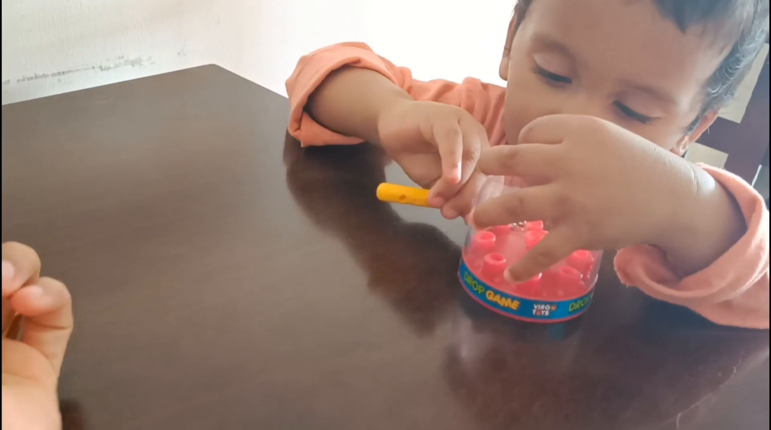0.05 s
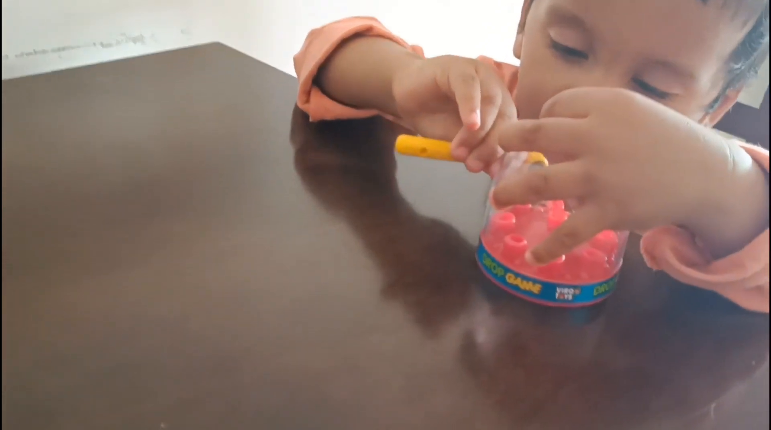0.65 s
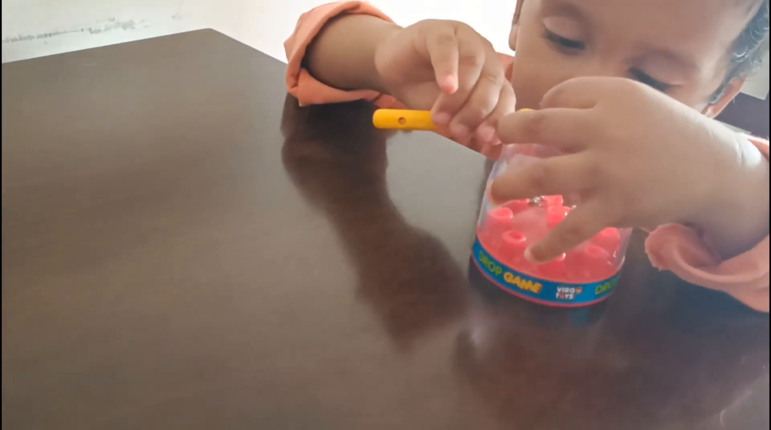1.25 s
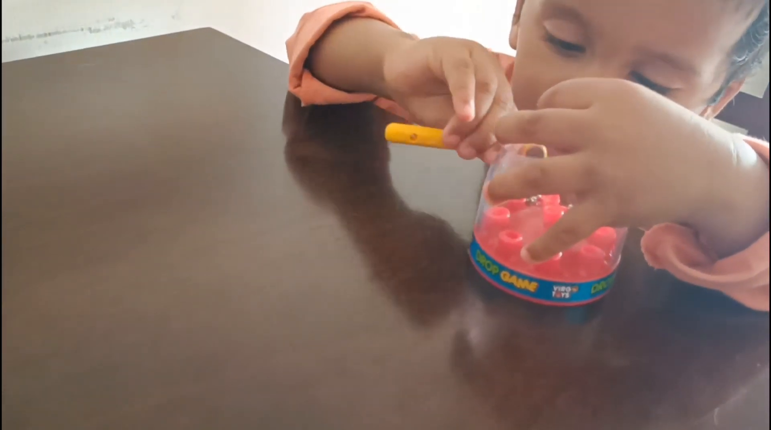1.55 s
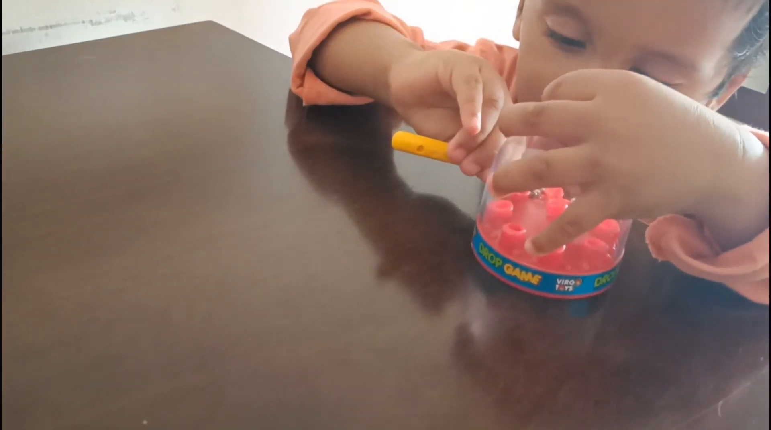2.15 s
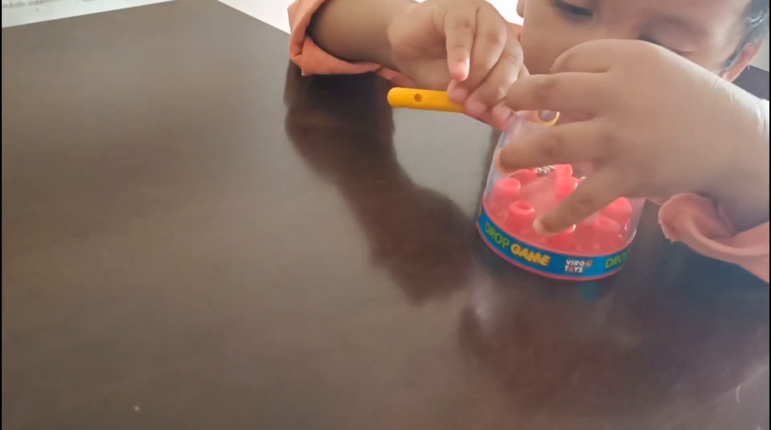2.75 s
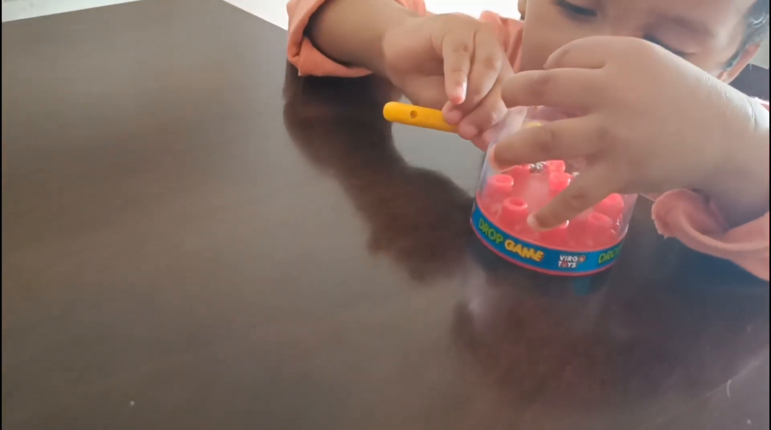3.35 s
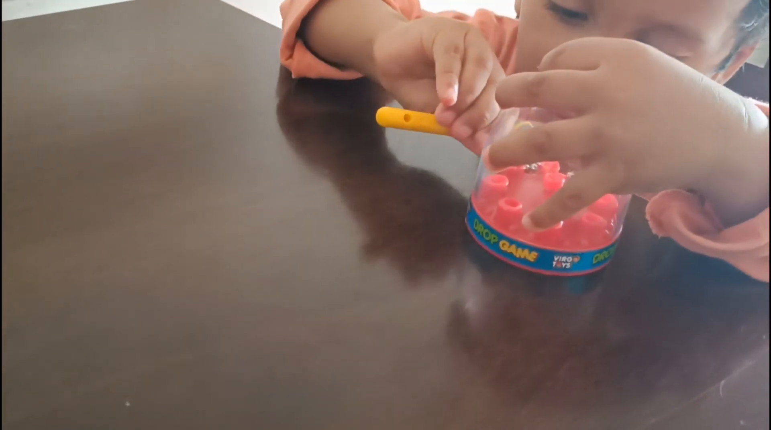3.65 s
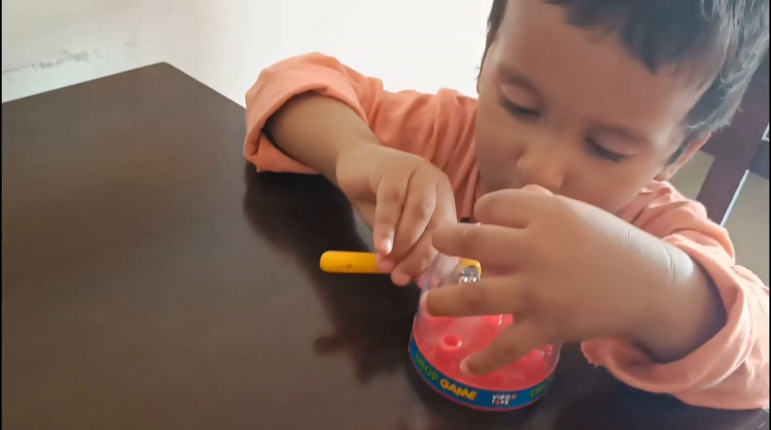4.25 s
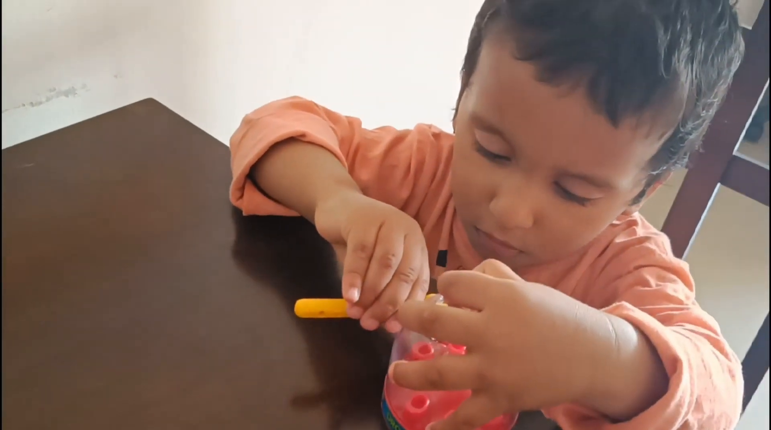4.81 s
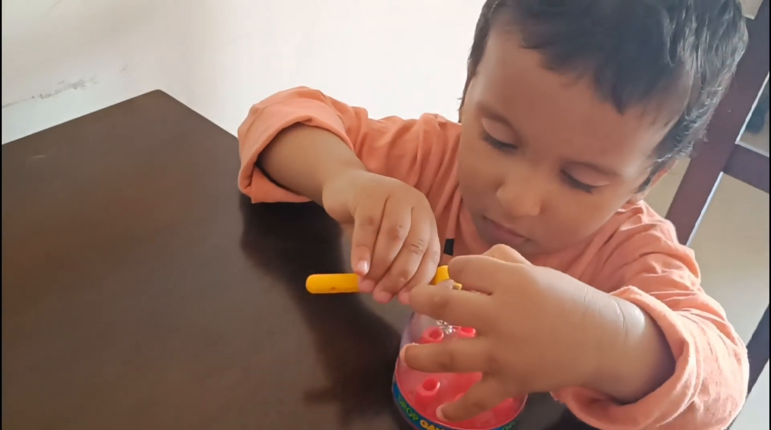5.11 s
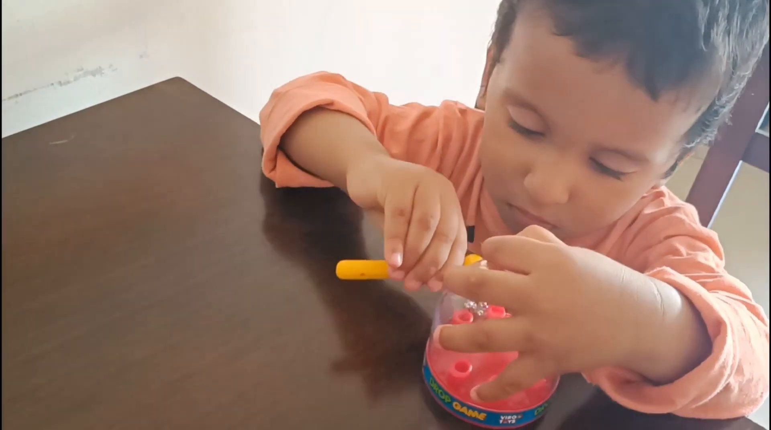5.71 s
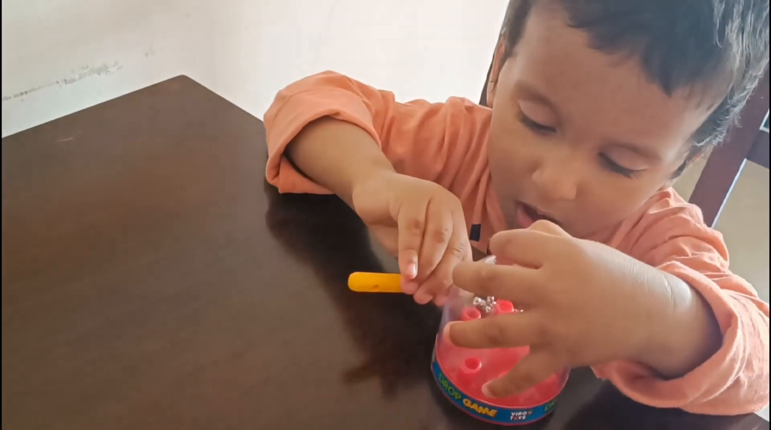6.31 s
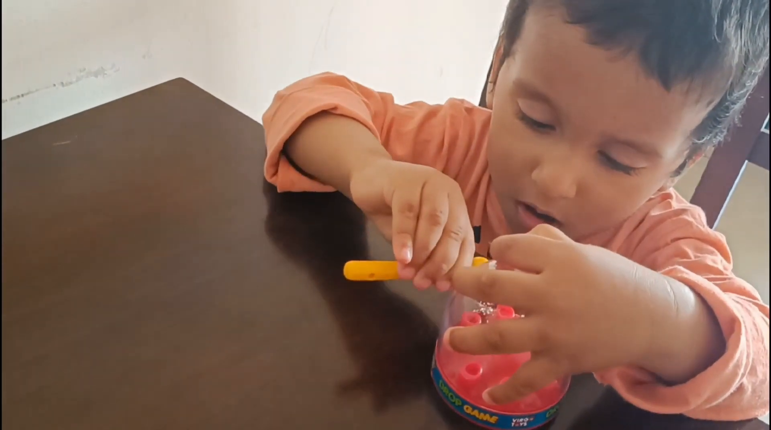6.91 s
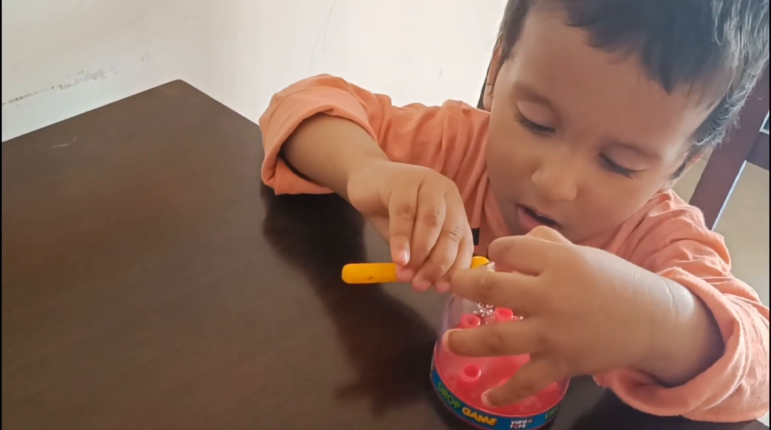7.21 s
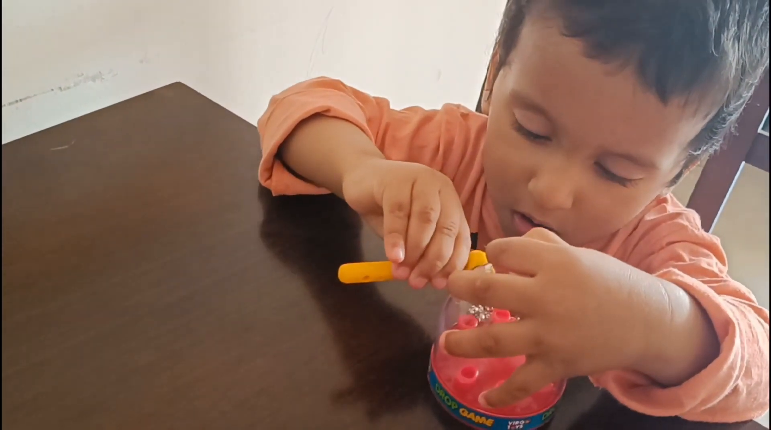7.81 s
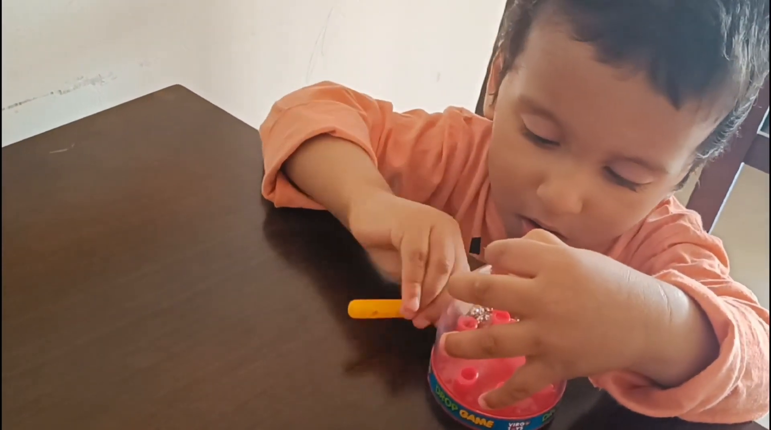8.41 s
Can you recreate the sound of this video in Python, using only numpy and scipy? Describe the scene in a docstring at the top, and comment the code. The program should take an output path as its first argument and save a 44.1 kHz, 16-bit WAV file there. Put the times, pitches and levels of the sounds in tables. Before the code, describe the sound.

Small steel beads click inside a plastic jar close to the microphone, each contact a sharp crack with a brief plastic ring. A few clicks come at 0.1 and 0.6 seconds, then a bunch clatters onto the tray from 1.1 to 1.3. The loudest clatter runs from 2.6 to 2.9 seconds. After a sparse stretch of light ticks, the beads click at 4.9, rattle at 5.3 and click again near 6.0 and 6.4. Soft ticking follows until 7.2, and a last strong clatter comes around 8 seconds. A plastic wand bumps the jar's neck with short, hollow knocks at about 0.6, 1.8, 3.5, 6.4 and 7.8 seconds. The bare room rings briefly after each click. The pauses are very quiet, with a faint, low motor hum far off and a few barely audible thin tones in the first half.

```python
"""Small steel beads click close by in a plastic jar on a table, as a child lifts them with a magnetic wand.
They snap to the wand, tick along the wall and drop in clattering bunches on the plastic tray; each
contact cracks and sets the plastic ringing. Now and then the wand knocks hollowly on the jar's neck.
The bare room rings after each click; far off, a motor hums and faint tones pass. The microphone is a
phone near the jar, with two ports and a noise suppressor that turns the pauses down."""
import sys
import numpy as np
from scipy import signal
from scipy.fft import rfft, irfft
from scipy.io import wavfile

SR = 44100
rng = np.random.default_rng(int(sys.argv[2]) if len(sys.argv) > 2 else 0)


def inscribe(sig):
    """Save sig as 16-bit PCM at rate SR to the path in sys.argv[1].

    A 1-D sig is mono; a 2-D sig holds one channel per row.
    Samples are clipped to [-1, 1] before scaling.
    """
    pcm = np.round(np.clip(np.atleast_2d(sig).T, -1, 1) * 32767)
    wavfile.write(sys.argv[1], SR, pcm.astype(np.int16))


N = 373086
CONTACT_SAMPLES = SR // 16


def undb(db):
    """Decibels to gain."""
    return 10 ** (np.asarray(db) / 20)


def unit(x):
    """Scale each channel to an energy of one."""
    return x / np.sqrt(np.sum(x ** 2, axis=-1, keepdims=True))


def along(points, hz):
    """Read (frequency_hz, value) points on a log-frequency axis."""
    f, value = np.transpose(points)
    return np.interp(np.log(np.maximum(hz, 1)), np.log(f), value)


def colour(x, points, size=1024):
    """Causal filter through (frequency_hz, gain_db) points, built from the cepstrum."""
    cepstrum = irfft(np.log(undb(along(points, np.fft.rfftfreq(size, 1 / SR)))))
    cepstrum[1:size // 2] *= 2
    cepstrum[size // 2 + 1:] = 0
    response = irfft(np.exp(rfft(cepstrum)))
    return signal.fftconvolve(np.atleast_2d(x), response[None], axes=-1)[:, :x.shape[-1]]


def add(out, start_s, sound):
    """Mix a stereo sound in at a time."""
    start = int(start_s * SR)
    part = sound[:, :N - start]
    out[:, start:start + part.shape[1]] += part


def band(centre_hz, width_hz):
    """A band of noise with an rms of one; at a few hertz, a random waver."""
    offset = (np.fft.rfftfreq(N, 1 / SR) - centre_hz) / width_hz
    return np.sqrt(N) * unit(irfft(rfft(rng.standard_normal(N)) / (1 + offset ** 2), N))


def room_tone(apart_hz=1500, flutter_db=3.0):
    """The dull air of the house, alike at both ports in the bass, with a faint, uneven hiss."""
    # spectrum of the air: frequency_hz, relative_density_db
    air_spectrum = [(20, -8.5), (60, -13.5), (140, -9), (220, -16.5), (400, -19), (800, -25), (1600, -29),
                    (3000, -37.5), (6000, -41.5), (10000, -48.5), (15000, -56)]
    # slow swell of the air: time_s, level_db
    air_levels = [(0, -64), (2.4, -60), (4.4, -64)]
    # rise and fall of the high hiss: time_s, level_db
    hiss_levels = [(0, -100), (.6, -81.5), (2.2, -74.5), (4.2, -72.5), (4.5, -100)]
    t, hz = np.arange(N) / SR, np.fft.rfftfreq(N, 1 / SR)
    mid, side = rfft(rng.standard_normal((2, N)))
    side = side * hz / (hz + apart_hz) * np.array([[1], [-1]])
    air = np.sqrt(N) * unit(irfft((mid + side) * undb(along(air_spectrum, hz)), N))
    air_db = np.interp(t, *np.transpose(air_levels))
    hiss = np.array([band(centre_hz=8260, width_hz=2400) for _ in range(2)])
    hiss_db = np.interp(t, *np.transpose(hiss_levels)) + flutter_db * band(centre_hz=2.3, width_hz=2.5)
    return air * undb(air_db) + hiss * undb(hiss_db)


def motor(waver_hz=1.0, uneven_db=0.5, rumble_db=-68.5, swell_db=3):
    """A distant motor hums, throbs unevenly at half its pitch, and rumbles."""
    # the motor's drifting run: time_s, pitch_hz, hum_db, throb_db
    run = [(0, 93.3, -70, -69), (0.502, 91.4, -64, -66), (0.77, 90.6, -54.5, -59.5),
           (1.05, 92.7, -65.5, -67), (2.4, 87.1, -65, -52.5), (3.1, 86.35, -62.5, -67),
           (4.4, 91.4, -60.5, -61.5), (6.15, 91.9, -61.5, -72.5), (6.5, 84, -71, -66),
           (7.199, 78.1, -71, -57.5), (8.4, 68.2, -76, -69)]
    t = np.arange(N) / SR
    time_s, pitch_hz, hum_db, throb_db = np.transpose(run)
    hz = np.interp(t, time_s, pitch_hz) + waver_hz * band(centre_hz=8.8, width_hz=2.3)
    phase = 2 * np.pi * np.cumsum(hz) / SR
    hum = np.sin(phase) * undb(np.interp(t, time_s, hum_db))
    wobble_db = uneven_db * band(centre_hz=3.4, width_hz=1.9)
    throb = np.sin(phase / 2) * undb(np.interp(t, time_s, throb_db) + wobble_db)
    rumble = band(centre_hz=32, width_hz=30)
    rumble *= undb(rumble_db + swell_db * band(centre_hz=2, width_hz=2.4))
    return np.sqrt(2) * (hum + throb) + rumble


def far_tones():
    """Faint, thin tones swell and fade far away."""
    # distant tones: start_s, length_s, pitch_hz, level_db
    notes = [(0.46, .18, 1750, -64), (2.3, .3, 1244, -76), (2.28, .3, 1790, -71), (3.15, .15, 1265, -64)]
    out = np.zeros((2, N))
    for start_s, length_s, pitch_hz, level_db in notes:
        t = np.arange(int(length_s * SR)) / SR
        swell = undb(level_db) * np.sin(np.pi * t / length_s)
        add(out, start_s, swell * np.sin(2 * np.pi * pitch_hz * t + rng.standard_normal((2, 1))))
    return out


def bare_room(x, tail_db=-3.0, build_s=0.0048, gap_s=0.004):
    """The room answers with a diffuse tail whose treble dies soonest, and an echo off the nearest wall."""
    # reverberation time: frequency_hz, t60_s
    decay_times = [(200, 0.94), (1000, 0.78), (2500, 0.59), (4500, 0.59), (8500, 0.51), (12000, 0.46),
                   (15000, 0.16)]
    # echo of the nearest wall: delay_s, level_db
    echoes = [(.024, -16.5)]
    t, hz = np.arange(SR) / SR, np.fft.rfftfreq(SR, 1 / SR)
    noise = rfft(rng.standard_normal((2, SR)))
    edges_hz = np.append(0, np.geomspace(200, SR / 2, 14))
    tail = 0
    for lo, hi in zip(edges_hz, edges_hz[1:]):
        part = irfft(noise * ((hz >= lo) & (hz < hi)), SR)
        tail = tail + part * np.exp(-np.log(1000) * t / along(decay_times, (lo + hi) / 2))
    build_up = 1 - np.exp(-np.maximum(t - gap_s, 0) / build_s)
    response = undb(tail_db) * unit(tail * build_up)
    for delay_s, level_db in echoes:
        response[:, int(delay_s * SR)] += undb(level_db)
    return signal.fftconvolve(x, response, axes=-1)[:, :N]


def ringing(modes, t, scatter_db, detune=0.008):
    """Decaying modes at two ports; the spot struck sets their mix, and fingers detune them a little."""
    hz, db, t60_s = np.transpose(modes)[:, :, None]
    spot, drift, apart = rng.standard_normal((3, len(hz), 1))
    pole = np.exp((2j * np.pi * hz * (1 + detune * drift) - np.log(1000) / t60_s) / SR)
    waves = np.cumprod(np.repeat(pole, len(t), axis=1), axis=1)
    # short waves reach the two ports out of step
    phase = rng.uniform(0, 2 * np.pi, hz.shape) + apart * hz / 2000 * np.array([-1, 1])
    weights = undb(db + scatter_db * spot) * np.exp(1j * phase)
    return np.einsum("mp,mt->pt", weights, waves).imag


def wand(gain_db=20.5, rise_s=0.00084, note_t60_s=0.02):
    """The plastic wand bumps the jar: a short, hollow knock, damped by the hand and pitched by the grip."""
    # knocks on the jar's neck: start_s, relative_level_db, lowest_note_hz
    knocks = [(0.578, -53, 1430), (0.598, -44.5, 1367), (1.81, -50, 1390), (3.496, -41, 1233),
              (6.404, -43.5, 1409), (7.822, -47, 1406)]
    # the whole wall flexing, above its lowest note: pitch_hz, relative_level_db, t60_s
    wall_modes = [(1850, -6.5, 0.013), (2670, -1.5, 0.015), (3827, -1.5, 0.017), (7300, -8.5, 0.01)]
    out = np.zeros((2, N))
    t = np.arange(CONTACT_SAMPLES) / SR
    attack = 1 - np.exp(-t / rise_s)
    for start_s, level_db, note_hz in knocks:
        ring = ringing([(note_hz, 0, note_t60_s)] + wall_modes, t, scatter_db=0.5)
        add(out, start_s, undb(level_db) * unit(ring * attack))
    return undb(gain_db) * out


def bead_click(shell, level_db, body_db, edge_db, firm_db=-22, rebound_s=0.0026, rebound_db=-4):
    """A bead hits plastic: a crack, the jar's ring, a quick rebound; lighter cracks die sooner."""
    # the dense, quickly damped crack: frequency_hz, gain_db
    crack_spectrum = [(150, -16.5), (500, -18), (850, -10), (1400, -3.5), (2300, -8.5), (3100, -9),
                      (3750, -1), (4700, 3.5), (6000, -1), (8500, 2), (10000, -0.5), (11300, -8),
                      (13000, -6.5), (15500, -13)]
    # ringing of jar and tray: pitch_hz, relative_level_db, t60_s
    jar_modes = [(1394, -11, 0.014), (1711, -9.5, 0.019), (2700, -18.5, 0.034), (3783, -3.5, 0.04),
                 (4464, -7.5, 0.05), (4560, -5, 0.045), (4730, -4, 0.037), (4830, -8, 0.043),
                 (5750, -13, .045), (6050, -13.5, 0.035), (7210, -6, 0.047), (7770, -4.5, 0.033),
                 (8300, -6.5, 0.04), (9086, -6, 0.034), (9880, -9.5, .04)]
    crack_t60_s, rise_s, ring_db = 0.021, 0.0015, -2.0  # for a contact at firm_db
    t = np.arange(CONTACT_SAMPLES) / SR
    force = undb(0.12 * (level_db - firm_db))
    noise = shell + rng.standard_normal((2, len(t)))
    noise += 0.5 * rng.standard_normal(len(t))  # common to both ports
    crack = colour(noise * np.exp(-np.log(1000) * t / (crack_t60_s * force)), crack_spectrum)
    attack = 1 - np.exp(-t / (rise_s * force))  # the wave needs a moment to spread over the wall
    ring = ringing(jar_modes, t, scatter_db=2)
    hit = unit(crack * attack) + force ** 2 * undb(ring_db) * unit(ring * attack)
    flight = int(rebound_s * (0.5 + rng.random()) * SR)
    rebound = undb(rebound_db) * np.pad(hit, ((0, 0), (flight, 0)))[:, :len(t)]
    # each contact has its own amount of hollow body and bright edge
    timbre = [(1700, body_db + 16), (3300, 0.0023), (6000, 0.0006), (8800, edge_db + 6.0)]
    return undb(level_db) * unit(colour(hit + rebound, timbre))


def beads(gain_db=14.0, bounces=9):
    """Steel beads strike wand and jar one by one, and bounce at random as each bunch hits the tray."""
    # contacts that stand out: start_s, relative_level_db, hollow_body_db, bright_edge_db
    contacts = [(0.102, -38, -8.5, -11), (0.112, -27, -35.5, -9.5), (0.15, -28.5, -18.5, -13),
                (0.579, -38, -17, -9), (0.595, -21.5, -21, -11), (0.608, -21, -16.5, -8),
                (0.982, -45, -16, -15), (1.063, -39, -40, -10), (1.105, -19, -17.5, -15.5),
                (1.128, -20.5, -16.5, -12), (1.138, -16, -29, -10), (1.15, -23, -17.5, -13),
                (1.172, -29, -13, -16), (1.229, -14, -26, -10.5), (1.241, -22, -15.5, -11),
                (1.267, -15.5, -29, -11), (1.323, -38, -18, -14), (1.81, -39, -20.5, -11),
                (1.831, -36.5, -20, -4), (1.855, -41.5, -24, -4.5), (2.62, -25.5, -14.5, -10),
                (2.669, -20.5, -22, -6.5), (2.707, -20.5, -25, -15), (2.726, -22.5, -20, -18),
                (2.739, -16, -20, -12), (2.744, -10, -21.5, -2.5), (2.755, -13.5, -19.5, -12),
                (2.764, -18, -20, -18), (2.776, -19.5, -20, -8), (2.79, -16, -20, -12),
                (2.866, -16.5, -26.5, -10), (2.895, -24, -25, -12), (2.908, -34, -23, -14),
                (3.496, -37.5, -19, -11), (3.531, -38, -17.5, 0.5), (4.358, -43.5, -20, 2.5),
                (4.388, -34.5, -13.5, -8.5), (4.58, -52, -4.5, -11), (4.829, -45.5, -16, -11),
                (4.837, -39.5, -16.5, -9.5), (4.893, -22.5, -22, -3), (4.96, -29, -18.5, -3.5),
                (5.267, -21, -15, -8.5), (5.285, -18, -24, -11.5), (5.297, -23, -18, -11),
                (5.311, -25.5, -15, -15), (5.332, -24, -15, -11), (5.341, -18.5, -17.5, -12.5),
                (5.943, -38.5, -16, -10), (5.954, -30.5, -23, -1), (5.963, -24.5, -20.5, -5),
                (6.024, -28, -18, -11.5), (6.405, -27.5, -20.5, -12), (6.63, -33.5, -16, -9.5),
                (6.687, -43.5, -9, -9), (6.746, -44.5, -14.5, -7), (7.021, -36, -31, -12.5),
                (7.055, -35, -23, -11.5), (7.078, -38.5, -18, -9.5), (7.108, -41.5, -23.5, -22),
                (7.132, -37.5, -29.5, -14.5), (7.17, -46, -19.5, -11), (7.207, -44, -19, -10.5),
                (7.822, -35, -18.5, -10), (7.848, -23.5, -22, -9), (7.959, -29, -17.5, -5),
                (7.969, -24, -23, -9), (7.976, -18.5, -24.5, -9), (8.006, -14.5, -21.5, -7.5),
                (8.028, -21, -22, -15.5), (8.044, -21, -20, -1), (8.069, -34, -20, -9)]
    # loose beads tumbling on the tray: start_s, length_s, relative_level_db
    bunches = [(1.111, 0.059, -31), (2.674, .065, -36.5), (2.749, 0.093, -28), (4.83, 0.065, -47),
               (5.275, .085, -28.5), (7.831, .028, -42)]
    shell = rng.standard_normal((2, CONTACT_SAMPLES))  # the jar's dense ringing, shared by all contacts
    out = np.zeros((2, N))
    for start_s, level_db, body_db, edge_db in contacts:
        add(out, start_s, bead_click(shell, level_db, body_db, edge_db))
    for start_s, length_s, level_db in bunches:
        for k in range(bounces):
            bounce_s = start_s + length_s * (k + rng.random()) / bounces
            add(out, bounce_s, bead_click(shell, level_db, body_db=-17, edge_db=-9))
    return undb(gain_db) * out


def scene(facing_db=3, wand_send_db=-7):
    """Close beads and wand, the room behind them and the far background; the left port faces the jar."""
    # colour of the left microphone port: frequency_hz, gain_db
    left_port = [(800, 3), (2000, -2), (4000, -6), (6100, -8.5), (6700, -19.5), (7400, -13.5), (8200, -3.5),
                 (9200, 4.5), (10000, 0), (12000, 0.5), (13300, -3), (14500, -14)]
    # colour of the right microphone port: frequency_hz, gain_db
    right_port = [(800, 2.5), (2500, 3.5), (4700, -0.5), (6000, -1), (7300, 0), (8200, 3.5), (9100, -4),
                  (10200, -16), (11200, -8.5), (11900, 0), (15400, -0.5)]
    clicks, knocks = beads(), wand()
    direct = (clicks + knocks) * undb([[facing_db], [0]])
    left, right = direct + bare_room(clicks + undb(wand_send_db) * knocks)
    jar = np.vstack([colour(left, left_port), colour(right, right_port)])
    return jar + room_tone() + motor() + far_tones()


def lag(x, time_s):
    """One-pole smoothing."""
    keep = np.exp(-1 / (time_s * SR))
    return signal.lfilter([1 - keep], [1, -keep], x)


def suppressor(x, open_db=-59.0, knee_db=3, listen_s=0.033, ahead_s=0.011):
    """Turns the sound down once the treble fades, the top most and the bass late; opens ahead of clicks."""
    bass_hz, treble_hz, top_hz = 260, 1000, 3500
    bass_cut_db, mid_cut_db, top_cut_db = 10, 9, 13
    bass_lag_s, release_s = 0.044, 0.039
    treble = signal.sosfilt(signal.butter(2, treble_hz, "high", fs=SR, output="sos"), x)
    bass = signal.sosfiltfilt(signal.butter(4, bass_hz, fs=SR, output="sos"), x)
    top = signal.sosfiltfilt(signal.butter(2, top_hz, "high", fs=SR, output="sos"), x)
    mid = x - bass - top
    heard_db = 10 * np.log10(lag(np.mean(treble ** 2, axis=0), listen_s) + 1e-18)
    coming_db = np.roll(heard_db, -int(ahead_s * SR))
    opening = 0.5 + 0.5 * np.tanh((coming_db - open_db) / knee_db)
    bass_gain = undb(bass_cut_db * (lag(opening, bass_lag_s) - 1))
    closing = np.maximum(opening, lag(opening, release_s)) - 1  # 0 open, -1 shut
    return bass * bass_gain + mid * undb(mid_cut_db * closing) + top * undb(top_cut_db * closing)


def record(dry):
    """The phone suppresses the pauses and cuts the highest treble."""
    cutoff_hz = 15800
    lowpass = signal.ellip(10, 0.2, 70, cutoff_hz, fs=SR, output="sos")
    return signal.sosfilt(lowpass, suppressor(dry))


dry = scene()
out = record(dry)
inscribe(out)
```